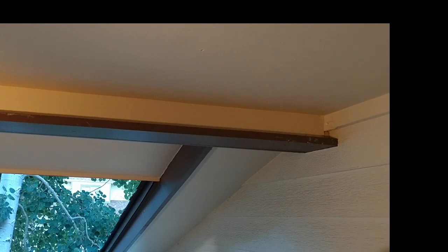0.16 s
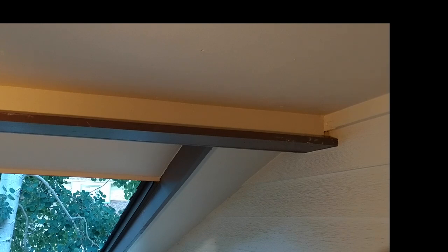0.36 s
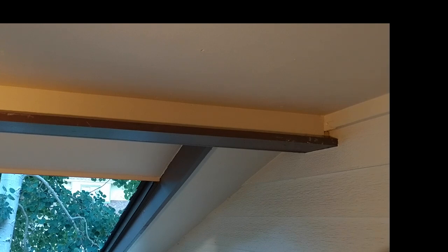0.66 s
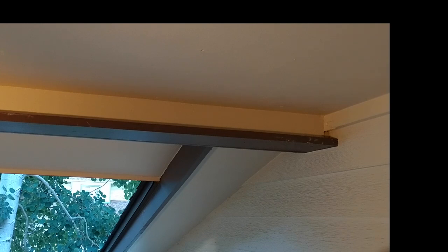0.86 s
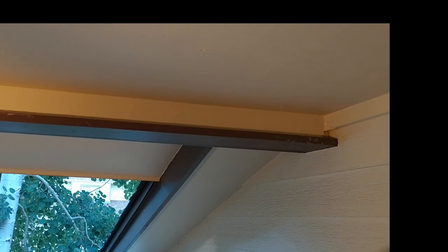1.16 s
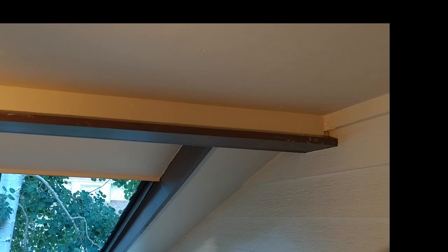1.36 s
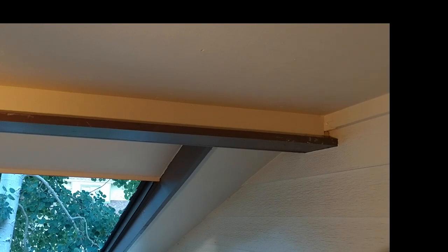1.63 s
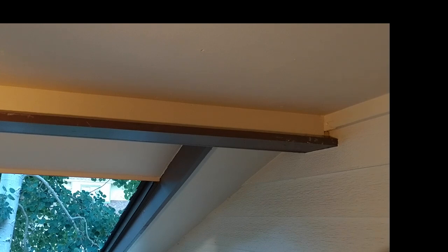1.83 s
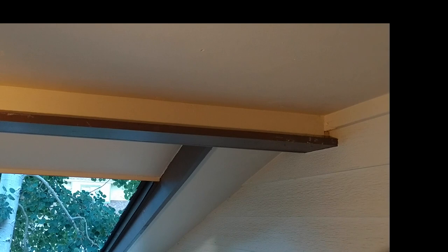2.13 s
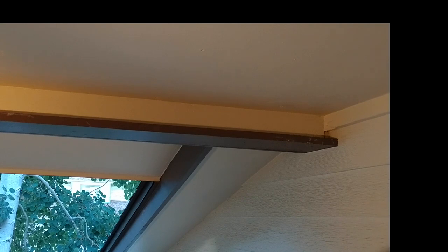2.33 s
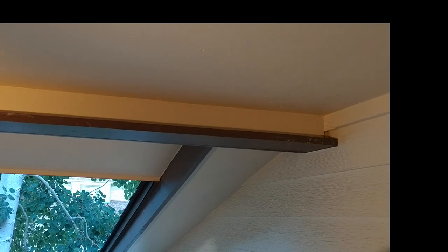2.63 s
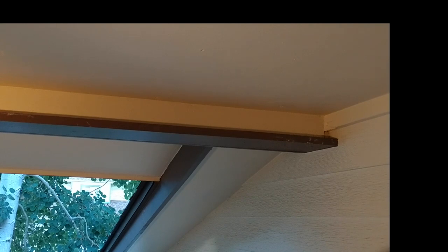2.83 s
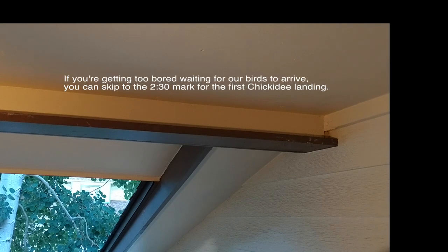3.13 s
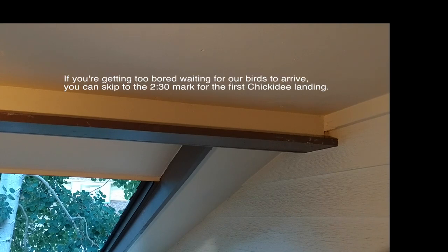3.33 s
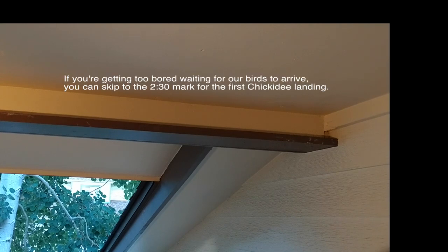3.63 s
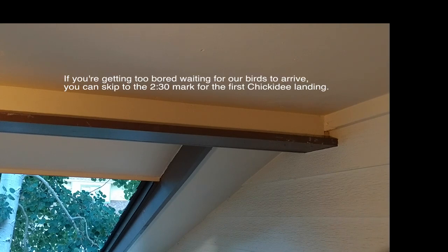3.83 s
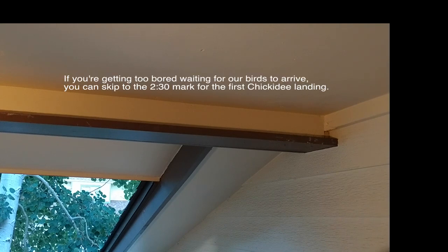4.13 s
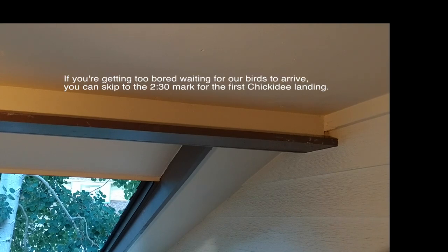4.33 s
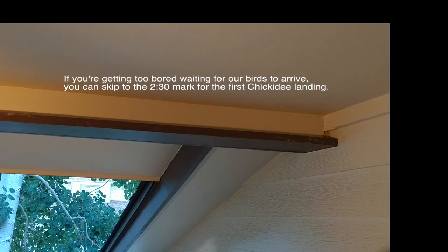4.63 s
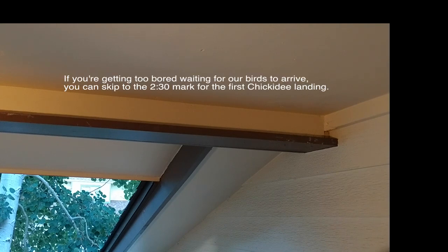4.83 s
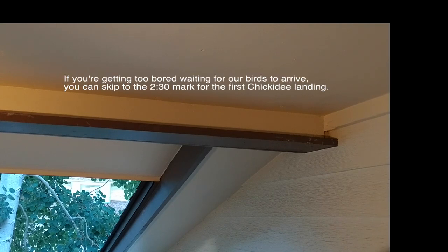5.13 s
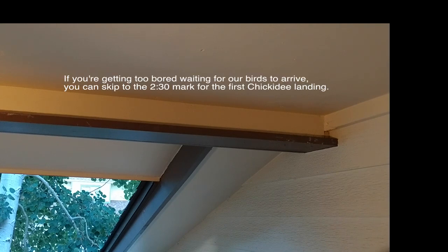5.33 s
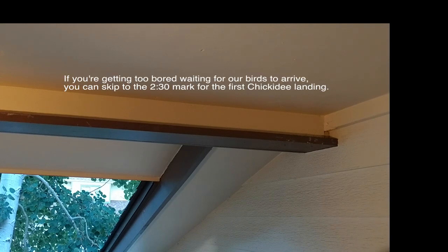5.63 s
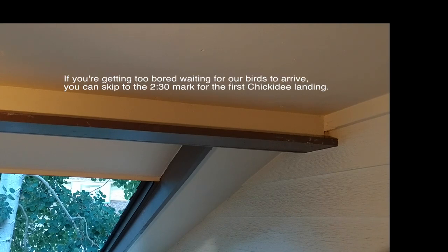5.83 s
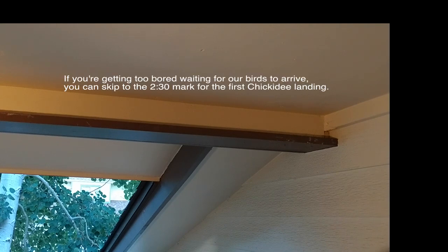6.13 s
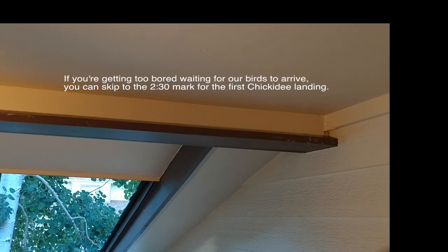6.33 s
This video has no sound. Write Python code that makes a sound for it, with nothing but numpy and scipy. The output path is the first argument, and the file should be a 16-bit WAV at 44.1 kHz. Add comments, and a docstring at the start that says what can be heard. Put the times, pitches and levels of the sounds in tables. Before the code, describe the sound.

A chickadee calls under a hard-walled porch roof, a little to the right of the microphone. After a brief opening chirp come two full calls, each a quick run of high, rasping whistles stepping down into four or five hoarse dee notes. Another call begins at the end. The notes have a short echo. Behind them lies a faint low rumble, with soft thuds and barely audible far-off yelps.

```python
"""A black-capped chickadee calls "chick-a-dee-dee" under a hard-walled porch roof.
Short arched, rasping whistles step down into hoarse notes made by the two coupled voices of its syrinx.
Each note arrives directly, off the near walls and as a diffuse tail.
Behind it: a low rumble, a thin steady whine, faint far-off yelps, a far engine and soft thuds."""
import sys
import numpy as np
from scipy import signal
from scipy.fft import rfft, irfft, next_fast_len
from scipy.io import wavfile
from scipy.ndimage import map_coordinates

SR = 44100
rng = np.random.default_rng(int(sys.argv[2]) if len(sys.argv) > 2 else 0)


def waveform_to_disk(signal):
    """Save audio, clipped to [-1, 1], as 16-bit WAV at the path in sys.argv[1]."""
    frames = np.transpose(np.atleast_2d(signal))
    scaled = np.clip(frames, -1, 1) * 32767
    samples = np.round(scaled).astype(np.int16)
    wavfile.write(sys.argv[1], SR, samples)


N = 285327


def amp(db):
    """Decibels to gain."""
    return 10 ** (np.asarray(db) / 20)


def unit(x):
    """Scale to rms 1."""
    return x / np.sqrt(np.mean(x ** 2) + 1e-20)


def along(points, hz):
    """Interpolate (Hz, value) points on a log axis."""
    knots_hz, values = np.transpose(points)
    return np.interp(np.log(hz + 1), np.log(knots_hz + 1), values)


def at_time(points, s):
    """Interpolate (seconds, value) points."""
    return np.interp(s, *np.transpose(points))


def wobble(rate_hz, size):
    """Smooth random curve, rate_hz knots a second."""
    knots = rng.standard_normal(size // 8 + 4)
    return map_coordinates(knots, [np.arange(size) * rate_hz / SR], mode="wrap")


def phase(hz):
    """Running phase of a pitch curve."""
    return 2 * np.pi * np.cumsum(hz) / SR


def filtered(x, response):
    """Apply a gain given as a function of Hz."""
    n = x.shape[-1]
    padded = next_fast_len(n + 8192)
    return irfft(rfft(x, padded) * response(np.fft.rfftfreq(padded, 1 / SR)), padded)[..., :n]


def add(out, start_s, x):
    """Mix x into out from start_s on."""
    i = round(start_s * SR)
    a, b = max(i, 0), min(i + x.shape[-1], N)
    out[..., a:b] += x[..., a - i:b - i]


def swell(t, length_s, rise_s, fall_s):
    """Envelope with rounded ends."""
    attack = np.sin(np.pi / 2 * np.clip(t / rise_s, 0, 1)) ** 2
    release = np.sin(np.pi / 2 * np.clip((length_s - t) / fall_s, 0, 1)) ** 2
    return attack * release


def placed(db, pan_db):
    """Left and right gains; positive pan is left."""
    return amp([[db + pan_db / 2], [db - pan_db / 2]])


def stereo_noise(spectrum, likeness):
    """Noise of rms 1 with a given colour and left-right correlation."""
    def response(hz):
        angle = np.arccos(np.clip(along(likeness, hz), -1, 1)) / 2
        return amp(along(spectrum, hz)) * [np.cos(angle), np.sin(angle)]
    mid, side = filtered(rng.standard_normal((2, N)), response)
    return unit(np.array([mid + side, mid - side]))


# Ambient noise colour. Each row: frequency in Hz, relative density in dB.
AIR_SPECTRUM = [(20, -16.5), (38, -13.5), (56, -8.5), (103, -2), (153, -6), (238, -7), (372, -14),
                (452, -12), (534, -19.5), (788, -17.5), (1500, -21), (2030, -22), (3540, -28),
                (15500, -27.5)]
# Ambient noise width. Each row: frequency in Hz, left-right correlation.
AIR_LIKENESS = [(60, 0.85), (180, 0.892), (550, 0.5), (1650, 0.0084), (4970, 0.027), (15000, 0.072)]
def rumble(air_db=-70, hum_hz=78, hum_db=-75):
    """Distant rumble and hiss with a wavering low hum."""
    hum = amp(hum_db + 2 * wobble(4, N)) * np.sin(phase(hum_hz + 5 * wobble(10, N)))
    air = amp(air_db + .5 * wobble(2.76, N)) * stereo_noise(AIR_SPECTRUM, AIR_LIKENESS)
    return air + hum


# Whine tones. Each row: frequency in Hz, level in dB.
WHINE_TONES = [(1280, -98.5), (1340, -89.5), (1396, -86.5)]
def whine():
    """Thin steady tones, opposite in phase at the two ears."""
    tones = sum(amp(db) * unit(np.sin(phase(hz + 2 * wobble(7.2, N)))) for hz, db in WHINE_TONES)
    return tones * np.array([[1], [-1]])


# Colour of the yelps' echo. Each row: frequency in Hz, relative density in dB.
ECHO_SPECTRUM = [(250, -28.5), (550, -8), (760, 1), (950, -10), (1300, -16), (2500, -30)]
# Swell of echo and chorus. Each row: time in seconds, level in dB.
CHORUS_LEVELS = [(0, -92), (4.6, -84), (5.2, -81), (5.9, -75), (6.15, -69.5), (6.47, -74)]
# Clear yelps. Each row: start in seconds, mid pitch in Hz, level in dB.
CLEAR_YELPS = [(2.685, 915, -77.5), (4.125, 662, -79), (4.86, 698, -75), (5.14, 820, -76.5),
               (5.355, 945, -76), (5.484, 688, -73), (5.772, 775, -71), (5.905, 570, -73.5),
               (6.135, 722, -68.5)]
def yelps(length_s=.076, chorus_hz=750, count=36, blur_hz=45, sag=.074, scatter_db=5.5):
    """Far falling yelps, perhaps dogs: a few clear ones, a growing chorus and a wash of echo."""
    echo_db = at_time(CHORUS_LEVELS, np.arange(N) / SR) + 1.5 * wobble(12, N)
    out = amp(echo_db) * stereo_noise(ECHO_SPECTRUM, likeness=[(700, .16)])
    starts_s = (np.arange(count) + rng.random(count)) / count * N / SR
    chorus = [(s, chorus_hz * np.exp(.1 * rng.normal()), at_time(CHORUS_LEVELS, s)) for s in starts_s]
    t = np.arange(int(length_s * SR)) / SR
    envelope = swell(t, length_s, rise_s=.031, fall_s=.047)
    for start_s, hz, db in CLEAR_YELPS + chorus:
        glide_hz = hz * (1 - sag * (t / length_s - .5))
        ears = [np.sin(phase(glide_hz + blur_hz * wobble(164, len(t))) + 2 * np.pi * rng.random())
                for _ in range(2)]
        add(out, start_s, placed(db, scatter_db * rng.normal()) * unit(np.array(ears) * envelope))
    return out


def far_engine(start_s=2.6, run_s=1.7, low_hz=225.6, high_hz=295, db=-80.5):
    """An engine is opened up once: its note swells as it climbs, levels off and fades."""
    t = np.arange(N) / SR - start_s
    hz = low_hz + (high_hz - low_hz) * np.sin(np.pi / 2 * np.clip(t / run_s, 0, 1))
    load = swell(t, run_s, rise_s=.47, fall_s=.47) * amp(db + 2.5 * wobble(10, N))
    return load * unit(np.sin(phase(hz + 1.2 * wobble(25, N))))


# Building modes. Each row: frequency in Hz, relative level in dB, T60 in seconds.
BUILDING_MODES = [(59, -4, 0.3), (87, 4.5, .15), (102.8, 1, 0.18), (135.3, -7, 0.16)]
# Clear thuds. Each row: start in seconds, relative level in dB.
CLEAR_THUDS = [(.052, -64), (1.458, -58.5), (2.265, -56.5), (2.543, -58), (2.854, -61), (3.079, -66),
               (3.309, -55), (3.808, -63.5), (4.253, -66), (4.924, -61.5), (5.513, -61.5), (5.919, -58)]
def thuds(faint_count=8, faint_db=-70.5, rebound_s=.045, rebound_db=-10, gain_db=6.5):
    """Soft blows, each with a softer rebound, briefly ring the low modes of the building."""
    out, t = np.zeros(N), np.arange(SR // 3) / SR
    onset = (1 - np.exp(-t / .0091)) ** 2
    faint = [((k + rng.random()) / faint_count * N / SR, rng.normal(faint_db, 1.5))
             for k in range(faint_count)]
    for start_s, db in CLEAR_THUDS + faint:
        for delay_s, contact_db in [(0, 0), (rebound_s, rebound_db)]:
            ring = sum(amp(mode_db - 60 * t / t60_s) * np.sin(2 * np.pi * (hz * t + rng.random()))
                       for hz, mode_db, t60_s in BUILDING_MODES)
            add(out, start_s + delay_s, amp(db + contact_db + gain_db) * ring * onset)
    return out


# Beak response. Each row: frequency in Hz, relative gain in dB.
BEAK_RESPONSE = [(1000, -45.5), (1800, -23.5), (2400, -11.5), (2900, -15), (3400, -3.5), (6500, 3),
                 (8000, 2), (9200, -16.5), (10500, -8), (13200, 6), (15500, -4.5)]
# Porch decay. Each row: frequency in Hz, T60 in seconds.
PORCH_DECAY = [(1800, .2), (3200, 0.41), (4300, 0.26), (6500, .28), (13000, .26)]
def beak_and_porch(note, direct_db=-2, walls_s=.016, left_lag_s=.00034, count=9):
    """The beak colours a note; it reaches each ear directly, off near walls and as a diffuse tail."""
    hz, t, noise = signal.stft(rng.standard_normal((2, SR // 2)), SR, nperseg=256)
    decay = amp(-60 * t / along(PORCH_DECAY, hz)[:, None])
    impulse = signal.istft(noise * decay, SR, nperseg=256)[1]
    impulse /= np.linalg.norm(impulse[0])
    wall_delays = (rng.random((2, count)) * np.arange(1, count + 1) / count * walls_s * SR).astype(int)
    for ear, delays in zip(impulse, wall_delays):
        ear[delays] += rng.choice([-1, 1], count) / np.sqrt(count)
    impulse[[0, 1], [round(left_lag_s * SR), 0]] += amp(direct_db)
    voice = filtered(note, lambda f: amp(along(BEAK_RESPONSE, f)))
    heard = signal.fftconvolve(voice[None], impulse, axes=1)
    return heard * np.linalg.norm(note) / np.linalg.norm(heard, axis=1, keepdims=True)


# Upper voice alone. Each row: start in seconds, level in dB.
UNDERTONE_NOTES = [(.861, -63.5), (1.39, -68), (4.37, -71)]
def undertones(length_s=.045, hz=1796):
    """The bird's upper voice slips out under a note as a faint low whistle."""
    out, t = np.zeros((2, N)), np.arange(int(length_s * SR)) / SR
    envelope = swell(t, length_s, rise_s=.021, fall_s=.012)
    for start_s, db in UNDERTONE_NOTES:
        tone = np.sin(phase(hz + 50 * wobble(300, len(t))))
        add(out, start_s, amp(db) * beak_and_porch(unit(tone * envelope)))
    return out


# Tones of the coupled voices. Each row: multiple of the upper voice, multiple of the lower voice.
VOICE_MULTIPLES = [(1, 0), (-1, 3), (0, 2), (1, 1), (2, 0), (3, -1), (4, -2), (5, -3), (1, 2), (2, 1),
                   (2, 2)]
# Each entry: relative level in dB of the matching tone above.
TONE_DB = [-19, -10.5, 0, -1, -7.5, -14, -12.5, -20, -20.5, -25, -42]
def dee(length_s, sum_hz, gap_hz, fall_hz, boost_db, arch_hz=120, jitter_hz=8):
    """Two voices near 1.5 and 1.8 kHz modulate each other into a hoarse, gently arched stack."""
    t = np.arange(int(length_s * SR)) / SR
    n, progress = len(t), t / length_s
    arched_hz = sum_hz - arch_hz * (2 * progress - 1) ** 2 - fall_hz * (progress - .5)
    upper = phase((arched_hz + gap_hz) / 2 + jitter_hz * wobble(119.7, n))
    lower = phase((arched_hz - gap_hz) / 2 + jitter_hz * wobble(119.7, n))
    stack = (amp(boost_db) - 1) * np.sin(upper + lower)
    for (j, k), db in zip(VOICE_MULTIPLES, TONE_DB):
        angle = j * upper + k * lower
        # irregular beating of the membranes smears each line
        smear = wobble(560, n) * np.sin(angle) + wobble(560, n) * np.cos(angle)
        stack += amp(db + 2.3 * wobble(12.1, n)) * (np.sin(angle) + .499 * smear)
    scrape = 1 + .0032 * fall_hz * (1 - progress) ** 2 * wobble(4200, n)  # a steep fall starts harsh
    flicker = amp(1.53 * wobble(69.3, n))
    return unit(stack * scrape * flicker * swell(t, length_s, rise_s=.035, fall_s=.012))


# Dees. Each row: start in seconds, nominal sum of the voices in Hz, their gap in Hz, level in dB.
DEE_NOTES = [(1.161, 3299, 288.4, -48.5), (1.358, 3319, 259.8, -52.5), (1.596, 3275, 249.3, -52),
             (1.845, 3280, 289.6, -50), (3.488, 3310, 286.5, -46), (3.738, 3291, 268.7, -47),
             (3.997, 3305, 266.2, -48), (4.245, 3283, 255, -48.5), (4.509, 3292, 261.6, -49),
             (6.289, 3285, 279.5, -46.4)]
def dee_notes(full_s=.21, pause_s=.033, slide_hz=149.8, slide_within_s=.16, ordinary_db=-49):
    """Yield (start, dB, sound). A dee just after a chick slides down from above and swells slowly."""
    next_starts_s = [row[0] for row in DEE_NOTES[1:]] + [np.inf]
    for (start_s, sum_hz, gap_hz, db), next_s in zip(DEE_NOTES, next_starts_s):
        slides = any(0 < start_s - row[0] < slide_within_s for row in CHICK_NOTES)
        extra_hz = slides * slide_hz
        length_s = min(full_s, next_s - start_s - pause_s)
        boost_db = 3 + .96 * (db - ordinary_db)  # the sum tone stands out more in louder dees
        note = dee(length_s, sum_hz + extra_hz / 2, gap_hz, fall_hz=5.5 + extra_hz, boost_db=boost_db)
        if slides:
            t = np.arange(len(note)) / SR
            note = unit(note * np.sqrt(swell(t, length_s, rise_s=.075, fall_s=.032)))
        yield start_s, db, note


def half_tone(length_s, top_hz, blur_hz=330):
    """The membrane skips every other cycle: a scratchy tone an octave under the whistle."""
    t = np.arange(int(length_s * SR)) / SR
    tone = np.sin(phase(top_hz / 2 + blur_hz * wobble(1500, len(t))))
    return unit(tone * swell(t, length_s, rise_s=.012, fall_s=.009))


def chick(length_s, top_hz, rise_hz, rasp, overtone_db, end_hz=3900, buzz_hz=330, second_hz=1450):
    """A whistle arches up, then bends to end_hz; a buzz and the unsteady second voice make it rasp."""
    t = np.arange(int(length_s * SR)) / SR
    n, progress, crest = len(t), t / length_s, .74
    drop = np.clip((progress - crest) / (1 - crest), 0, 1) ** 1.7
    climb_left = np.clip(1 - progress / crest, 0, 1) ** 2
    arched_hz = top_hz - rise_hz * climb_left - (top_hz - end_hz) * drop
    hoarse = rasp + .3 * drop  # the voice breaks up at the end
    buzz = np.sin(phase(buzz_hz * (1 + .2 * wobble(200, n))))
    angle = phase(arched_hz + hoarse * (600 * buzz + 380 * wobble(2500, n)))
    second_voice = np.sin(phase(second_hz * (1 + .22 * wobble(700, n))))
    overtones = np.sin(2 * angle + wobble(1500, n)) + amp(-10) * np.sin(3 * angle)
    tone = (np.sin(angle) + amp(overtone_db) * overtones) * (1 + 1.1 * hoarse * second_voice)
    return unit(tone * swell(t, length_s, rise_s=.026, fall_s=.009))


# Chicks. Each row: start in seconds, crest pitch in Hz, rasp share, level in dB.
CHICK_NOTES = [(-.062, 5900, .43, -40), (.025, 4682, 0.49, -36.5), (.855, 6744, .1, -29.5),
               (.955, 5862, .48, -34), (1.039, 4855, 0.48, -38.5), (1.12, 3833, 0.37, -42.5),
               (3.251, 6310, .47, -33.5), (3.323, 5390, .52, -36.5), (3.405, 4554, 0.47, -39.5),
               (6.036, 6447, .48, -32.5), (6.113, 5600, .5, -34), (6.185, 4333, .42, -37)]
def chick_notes(length_s=.054, full_rasp=.45, base_hz=3350, bright_hz=4980, break_hz=4530):
    """Yield (start, dB, sound). Higher, harsher notes climb further and carry stronger overtones."""
    for start_s, top_hz, rasp, db in CHICK_NOTES:
        clean = max(1 - rasp / full_rasp, 0)
        rise_hz = .52 * (top_hz - base_hz) * (1 - .7 * clean)
        overtone_db = -16.7 - 4.5 * clean - .013 * max(bright_hz - top_hz, 0)
        whistle = chick(length_s, top_hz, rise_hz, rasp, overtone_db)
        low_cut_hz = min(3450, .724 * top_hz)
        whistle = filtered(whistle, lambda hz: .15 + .78 / (1 + (low_cut_hz / (hz + 1)) ** 20))
        half_db = -13.5 - .018 * abs(top_hz - break_hz)
        yield start_s, db, unit(whistle + amp(half_db) * half_tone(length_s, top_hz))


# The bird's small turns. Each row: time in seconds, left minus right in dB.
TURN_PAN = [(.1, -.3), (.9, .7), (1.7, -1.2), (4.1, .2), (6.4, 1)]
# Balance at the ears. Each row: frequency in Hz, left minus right in dB.
EAR_BALANCE = [(3300, -4), (4300, -4), (5500, -.7), (7000, -0.5), (12000, -10)]
def chickadee():
    """Calls from a perch a little to the right; the left ear loses some top treble."""
    out = np.zeros((2, N))
    for start_s, db, note in [*chick_notes(), *dee_notes()]:
        add(out, start_s, placed(db, at_time(TURN_PAN, start_s)) * beak_and_porch(note))
    return filtered(out, lambda hz: amp(along(EAR_BALANCE, hz) * np.array([[.5], [-.5]])))


def scene():
    """The bird over a quiet evening."""
    return chickadee() + undertones() + thuds() + far_engine() + yelps() + whine() + rumble()


def record(dry):
    """Roll off the deep bass and cut the highest treble."""
    low_hz, top_hz = 40, 15700
    highpass = signal.butter(2, low_hz, "highpass", fs=SR, output="sos")
    return filtered(signal.sosfilt(highpass, dry), lambda hz: hz < top_hz)


dry = scene()
out = record(dry)
waveform_to_disk(out)
```